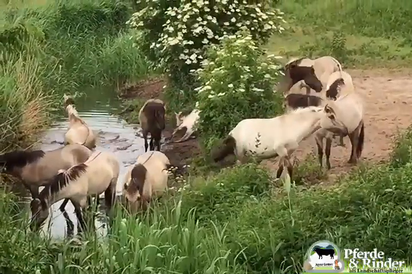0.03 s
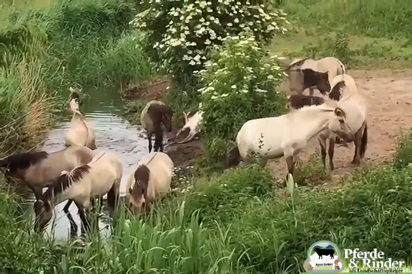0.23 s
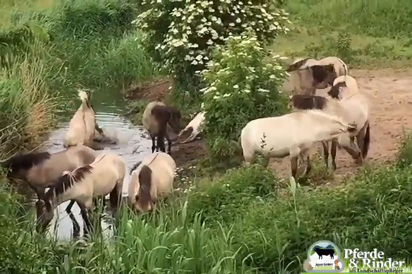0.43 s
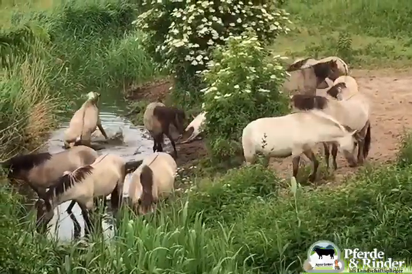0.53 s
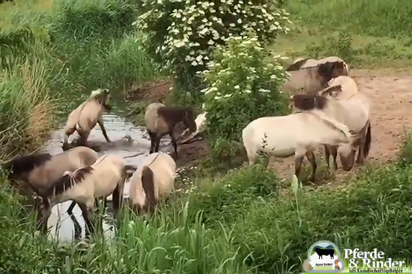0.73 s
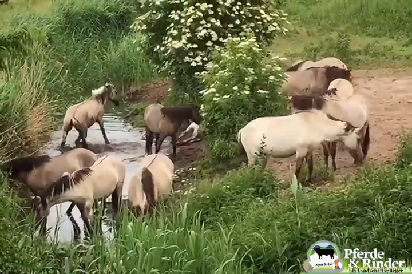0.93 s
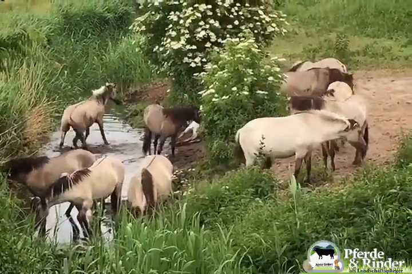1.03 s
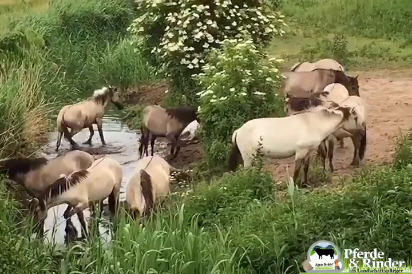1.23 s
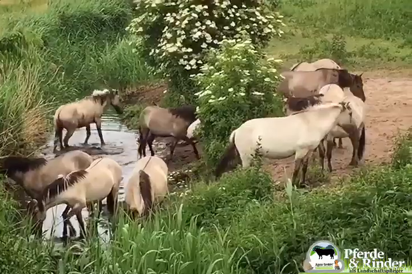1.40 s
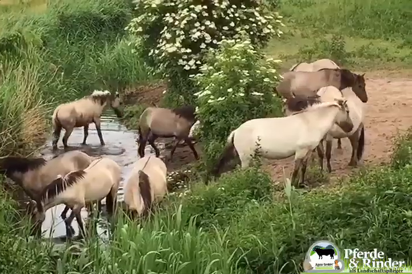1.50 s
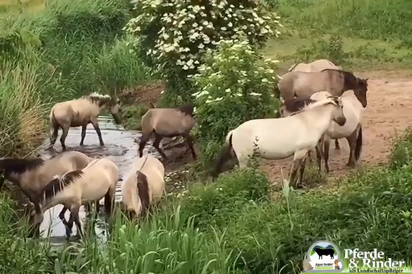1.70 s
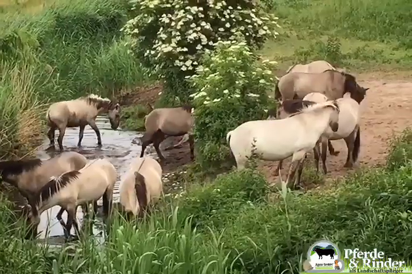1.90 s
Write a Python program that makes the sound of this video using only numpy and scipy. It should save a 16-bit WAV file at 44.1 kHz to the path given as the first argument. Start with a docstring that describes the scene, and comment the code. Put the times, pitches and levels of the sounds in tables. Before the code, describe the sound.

A horse splashes through shallow water while a small bird chirps and wind rumbles.

```python
"""A shallow pond, where a horse heaves itself up and wades on, some way off.
Each leg throws up spray and a cloud of ringing bubbles. Water slaps down on water, and
pockets of air plop as it closes again. A small bird chirps. Gusts of wind rumble on the
microphone, over the steady hiss of reeds and leaves."""
import sys
import numpy as np
from scipy import signal
from scipy.fft import rfft, irfft
from scipy.io import wavfile
from scipy.ndimage import uniform_filter1d

SR = 44100
rng = np.random.default_rng(int(sys.argv[2]) if len(sys.argv) > 2 else 0)


def put_to_file(sound):
    """Save the sound as 16-bit audio at rate SR, in the file named by the first command-line argument."""
    columns = np.atleast_2d(sound).T  # one column per channel
    safe = np.clip(columns, -1, 1)
    whole_steps = np.round(safe * 32767)
    wavfile.write(sys.argv[1], SR, whole_steps.astype(np.int16))


N = 85995

# A "colour" says how strong the low and high parts of a sound are, compared with each other.
# hiss of reeds and leaves (frequency [Hz], level [dB])
LEAF_COLOUR = [(88, -27), (150, -43), (175, 2.5), (490, -2.5), (561, -1.5), (766, -2), (894, -1.5),
               (1150, -0.5), (1400, -2), (4060, -6.5), (4650, -10), (5130, -9), (15500, -21)]
# deep rumble of the wind (frequency [Hz], level [dB])
RUMBLE_COLOUR = [(25, -22), (40, 0.5), (55, -2), (76, 1), (92, -4), (120, -23), (160, -36.5)]
# how the rumble comes and goes (time [s], level [dB])
RUMBLE_GUSTS = [(0.0, -73), (0.033, -63.5), (0.065, -89), (0.093, -48), (.125, -59), (0.175, -58),
                (0.2, -46.5), (0.227, -41), (0.266, -56), (.282, -49), (0.307, -41.5), (0.336, -51.5),
                (0.386, -43), (0.404, -33.5), (0.429, -32), (0.446, -47), (0.495, -50), (0.516, -41),
                (0.551, -46.5), (.57, -60), (0.589, -43), (0.64, -59), (0.668, -37.5), (0.69, -50),
                (0.709, -33.5), (0.738, -68), (0.782, -43), (0.802, -64), (0.828, -44), (0.874, -60),
                (0.898, -56), (0.94, -35.5), (0.982, -54), (1.004, -43.5), (1.062, -40.5), (1.086, -50),
                (1.136, -43.5), (1.182, -60), (1.231, -40.5), (1.26, -49), (1.337, -50), (1.362, -42),
                (1.377, -40.5), (1.401, -56), (1.473, -43.5), (1.51, -57.5), (1.574, -46.5), (1.62, -65),
                (1.655, -54), (1.69, -60), (1.735, -59), (1.777, -50.5), (1.9, -73), (1.95, -57)]
# flutter of the wind, a little higher than the rumble (frequency [Hz], level [dB])
FLUTTER_COLOUR = [(115, 5), (140, -0.5), (195, -6.5), (250, -20), (320, -22.5)]
# how the flutter comes and goes (time [s], level [dB])
FLUTTER_GUSTS = [(0.0, -77), (.18, -71), (.235, -56.5), (.285, -68), (0.334, -48.5), (.36, -63),
                 (.395, -50), (.435, -70), (.49, -59.5), (0.55, -44), (.582, -64), (.612, -51), (.645, -60),
                 (0.681, -57), (0.696, -47), (.722, -66), (.77, -56), (.87, -71), (0.929, -47), (.975, -62),
                 (1.06, -61.5), (1.33, -70.5), (1.95, -74.5)]
# bird notes (start [s], length [s], first pitch [Hz], middle pitch [Hz], last pitch [Hz],
# level of the tone an octave up [dB], level of the base tone [dB])
CHIRPS = [(0.052, 0.05, 2213, 2385, 2230, -59.5, -67), (0.098, .012, 2190, 2160, 2120, -65, -78),
          (0.222, 0.018, 2300, 2336, 2290, -57, -56.5), (0.242, 0.023, 2085, 2017, 2030, -58, -85),
          (0.372, 0.018, 2270, 2180, 2220, -57, -66), (0.389, 0.02, 1975, 1934, 1990, -55, -72),
          (0.514, 0.01, 2170, 2180, 2194, -54.5, -76), (0.524, 0.022, 2260, 2310, 2300, -59, -61),
          (0.549, 0.016, 2000, 1990, 1990, -57.5, -82), (0.679, 0.042, 2245, 2330, 2345, -56, -56.5),
          (0.769, 0.012, 2170, 2190, 2200, -57.5, -77), (0.819, 0.037, 2270, 2288, 2254, -56, -55.5),
          (1.144, 0.0425, 2247, 2255, 2350, -62, -58.5), (1.31, 0.047, 1946, 1930, 2030, -67, -83)]
# patter of the spray (frequency [Hz], level [dB])
SPRAY_COLOUR = [(500, 2.5), (1500, -22), (3000, 2), (4500, -8), (6200, -3), (7500, -9), (9500, -10.5),
                (10600, -16.5), (12500, -11.5), (15500, -26)]
# thin jets of water (peak time [s], rise [s], fall [s], level [dB], centre frequency [Hz])
JETS = [(1.196, 0.01, 0.012, -66, 10900), (1.567, 0.02, .016, -66.5, 9300),
        (1.676, 0.0069, 0.0097, -61, 6200)]
# water landing flat on water (time [s], peak level [dB], centre frequency [Hz])
SLAPS = [(0.8425, -49, 1500), (0.8621, -42, 3060), (0.9986, -42, 2350), (1.521, -47, 1820)]
# crack of one slap (frequency [times the centre frequency], level [dB])
SLAP_COLOUR = [(.5, -12), (1, 18), (1.5, 5.5), (2.2, -5), (3.3, -9), (5.2, -12)]
# big air pockets (time [s], pitch [Hz], peak level [dB], fade time [s], rise [times the fade time])
AIR_POCKETS = [(.504, 645, -50.5, 0.0068, .8), (.7842, 816, -41.5, 0.0014, 1.2),
               (.8535, 920, -36.5, 0.0017, 0.83), (.852, 602, -41.5, 0.0033, 0.89),
               (.876, 1140, -46, 0.0031, 0.94), (.909, 1190, -40.5, 0.0029, .7),
               (.921, 595, -44, 0.0042, 0.77), (0.926, 340, -55, .004, 0.88), (.964, 1056, -45, 0.004, .7),
               (0.973, 1720, -53, 0.0033, 0.58), (0.9998, 1160, -32, 0.00076, .7),
               (1.1045, 583, -43, 0.0049, 1.25), (1.4405, 732, -40.5, 0.0035, 1.1),
               (1.4565, 692, -42.5, 0.0043, 0.65), (1.531, 927, -46.5, 0.0031, .6),
               (1.637, 600, -52, 0.0067, 1.7), (1.659, 629, -42, 0.007, 0.77),
               (1.661, 910, -43, .0035, 0.52), (1.692, 1580, -48, 0.0033, 0.44),
               (1.700, 905, -46, .006, 0.27), (1.716, 1795, -54.5, 0.0063, 0.65)]
# falling drops (time [s], pitch [Hz], peak level [dB], fade time [s])
DROPS = [(1.151, 3460, -55.5, 0.0034), (1.153, 2320, -50.5, 0.0023), (1.243, 1880, -56, .004),
         (1.277, 1670, -50.5, .008), (1.304, 1550, -52.5, 0.0059), (1.320, 1530, -55.5, 0.004),
         (1.732, 2750, -47.5, 0.0018)]
# surges of water pushed by the legs (peak time [s], rise [s], fall [s], bubble level before
# colouring [dB], middle bubble pitch [Hz], spread of pitches [octaves], spray level [dB])
SURGES = [(.512, .009, 0.011, -59, 675, 0.303, -80), (.548, 0.024, 0.042, -58, 1289, 0.72, -70),
          (.65, 0.043, 0.1, -60, 1271, 0.76, -62), (.721, 0.028, 0.16, -78, 2640, 0.64, -66),
          (.797, 0.017, 0.033, -53.5, 910, 0.61, -61), (.843, .012, 0.046, -49.5, 1007, 0.58, -55),
          (.918, 0.031, .069, -49.5, 850, 0.72, -58.5), (.975, 0.013, 0.027, -47.5, 1297, 0.42, -60.5),
          (1.02, .026, 0.058, -49.5, 1422, 0.78, -59), (1.115, 0.017, 0.034, -53.5, 1046, 0.31, -64.5),
          (1.16, .025, 0.13, -57.5, 1700, 0.82, -64), (1.285, 0.042, 0.23, -61, 1462, 0.75, -68),
          (1.411, .008, 0.05, -57, 929, 0.358, -65.5), (1.525, .022, 0.035, -54.5, 1432, 0.78, -62),
          (1.573, .018, 0.023, -54.5, 1405, 0.73, -60.5), (1.653, 0.021, 0.017, -54, 621, .17, -67),
          (1.705, .016, 0.021, -52.5, 1051, 0.459, -61.5), (1.84, 0.021, 0.022, -64, 1190, 0.66, -87)]
# tone of the bubble clouds (frequency [Hz], boost or cut [dB])
CLOUD_COLOUR = [(200, -26), (350, 2.5), (460, -3.5), (590, 6), (760, -4), (1000, 3.5), (1200, -4),
                (1400, -3.5), (1650, 1), (2000, -3), (2800, 3), (4000, -4), (9000, 1.5)]


def gain(db):
    """Turn decibels into a number to multiply a sound by."""
    return 10 ** (np.asarray(db) / 20)


def unit(x):
    """Scale a signal so that its average strength (rms) is 1."""
    return x / np.sqrt(np.mean(x ** 2) + 1e-20)


def colour(x, points):
    """Shape the lows and highs by (Hz, dB) points, dropping 23.5 dB an octave past both ends."""
    hz, db = np.array(points, float).T
    octave = np.log2(np.maximum(np.arange(N + 1) * SR / (2 * N), 1))
    outside = np.maximum(np.log2(hz[0]) - octave, 0) + np.maximum(octave - np.log2(hz[-1]), 0)
    curve_db = np.interp(octave, np.log2(hz), db) - 23.5 * outside
    return irfft(rfft(x, 2 * N) * gain(curve_db))[:N]


def drift(turns_per_s):
    """A smooth random wander, about 1 in size."""
    step = max(int(SR / turns_per_s), 1)
    stairs = np.repeat(rng.standard_normal(N // step + 1), step)
    return unit(uniform_filter1d(stairs, step)[:N])


def add(out, start, sound):
    """Mix a sound in at a start time in seconds."""
    i = int(start * SR)
    if 0 <= i < N:
        out[i:i + len(sound)] += sound[:N - i]


def swell(peak, rise, fall):
    """A loudness curve that rises smoothly to its peak, then dies away."""
    t = np.arange(N) / SR - peak
    return np.exp(-.5 * (np.minimum(t, 0) / rise) ** 2 - np.maximum(t, 0) / fall)


def echo(x, level_db, tail_s):
    """Banks and bushes scatter sound back as a soft tail that fades by 60 dB in tail_s."""
    t = np.arange(SR // 2) / SR
    tail = rng.standard_normal(len(t)) * np.exp(-np.log(1000) * t / tail_s) * (t > .006)
    return x + gain(level_db) * signal.fftconvolve(x, tail / np.linalg.norm(tail))[:N]


def leaves(level_db=-62.5):
    """Far reeds and bushes hiss at a nearly steady level."""
    hiss = unit(colour(rng.standard_normal(N), LEAF_COLOUR))
    return hiss * gain(level_db + .5 * drift(6.35))


def swirls(tone, gusts, smooth_s=0.036):
    """Swirls of air hit the microphone: low noise, evened out so that the gusts set its loudness."""
    noise = colour(rng.standard_normal(N), tone)
    power = np.abs(signal.hilbert(noise)) ** 2 / 2
    strength = np.sqrt(uniform_filter1d(power, int(smooth_s * SR)))
    times, db = np.array(gusts).T
    return noise / strength * gain(np.interp(np.arange(N) / SR, times, db))


def wind(boost_db=1):
    """Big swirls of air rumble, and smaller ones flutter in the early gusts."""
    rumble = swirls(RUMBLE_COLOUR, RUMBLE_GUSTS)
    flutter = swirls(FLUTTER_COLOUR, FLUTTER_GUSTS)
    return gain(boost_db) * (rumble + flutter)


def bird(tremble_db=0.9):
    """A small bird sings short bending notes: a base tone plus a mostly louder one an octave up."""
    out = np.zeros(N)
    wobble = 1 + 0.0068 * drift(300)
    for start, length, first_hz, middle_hz, last_hz, octave_db, base_db in CHIRPS:
        progress = np.linspace(0, 1, int(length * SR))
        bend = np.polyfit([0, .5, 1], [first_hz, middle_hz, last_hz], 2)
        hz = np.polyval(bend, progress) * wobble[int(start * SR):][:len(progress)]
        phase = 2 * np.pi * np.cumsum(hz) / SR
        note = gain(base_db) * np.sin(phase) + gain(octave_db) * np.sin(2 * phase)
        loudness = np.sqrt(np.abs(np.sin(np.pi * progress)))
        add(out, start, loudness * note)
    return out * gain(tremble_db * drift(160))


def spray(droplets_per_s=6200, scatter_db=0.5):
    """Fine droplets patter back down with each surge, each one a tiny tick."""
    lands = rng.random(N) < droplets_per_s / SR
    ticks = lands * rng.standard_normal(N) * gain(scatter_db * rng.standard_normal(N))
    power = sum((gain(db) * swell(peak, rise, fall)) ** 2 for peak, rise, fall, *_, db in SURGES)
    return unit(colour(ticks, SPRAY_COLOUR)) * np.sqrt(power)


def jets(half_width_octaves=0.33):
    """Thin jets squirt up beside a hoof, each with a brief high hiss."""
    out = np.zeros(N)
    edge = 2 ** half_width_octaves
    for peak, rise, fall, db, hz in JETS:
        band = [(hz / edge, -12), (hz, 0), (hz * edge, -12)]
        hiss = unit(colour(rng.standard_normal(N), band))
        out += hiss * gain(db) * swell(peak, rise, fall)
    return out


def slaps(fade_s=0.0028):
    """A sheet of water lands flat with a short crack; the smaller the sheet, the higher it sounds."""
    out = np.zeros(N)
    t = np.arange(N) / SR
    for start, db, hz in SLAPS:
        burst = rng.standard_normal(N) * (t >= start) * np.exp(-np.abs(t - start) / fade_s)
        crack = colour(burst, [(hz * multiple, level) for multiple, level in SLAP_COLOUR])
        out += gain(db) * crack / np.abs(crack).max()
    return out


def bubble(hz, fade_s, rise, climb=0.019):
    """A pocket of air rings, and its pitch climbs as it nears the surface."""
    age = np.arange(int(6 * fade_s * SR) + 2) / (SR * fade_s)  # counted in fade times, like rise
    loudness = (1 - np.exp(-(age / rise) ** 2)) * np.exp(-age)
    phase = 2 * np.pi * hz * fade_s * (age + climb * age ** 2 / 2)
    return loudness / loudness.max() * np.sin(phase)


def plops():
    """Big air pockets and falling drops each ring out as one clear bubble."""
    out = np.zeros(N)
    for start, hz, db, fade_s, rise in AIR_POCKETS:
        add(out, start, gain(db) * bubble(hz, fade_s, rise))
    for start, hz, db, fade_s in DROPS:
        add(out, start, gain(db) * bubble(hz, fade_s, rise=0.32))
    return out


def bubble_clouds(bubbles_per_s=2100, fade_cycles=3.7, scatter_db=1.7):
    """Each surge from a leg traps a thick cloud of small bubbles, pitched around its own middle note."""
    out = np.zeros(N)
    for peak, rise, fall, db, middle_hz, spread, _ in SURGES:
        cloud = np.zeros(N)
        start, length = peak - 3 * rise, 3 * rise + 4 * fall
        count = int(bubbles_per_s * length)
        chances = rng.standard_normal((2500, 4))[:count]  # four random numbers for each bubble
        for k, (late, pitch, loud, ring) in enumerate(chances):
            hz = np.clip(middle_hz * 2 ** (spread * pitch), 250, 10000)
            fade_s = fade_cycles * np.exp(0.36 * ring) / hz
            strength = gain(scatter_db * loud) * np.sqrt(hz / middle_hz)
            add(cloud, start + (k + late) / bubbles_per_s, strength * bubble(hz, fade_s, rise=0.42))
        cloud = unit(cloud) * np.sqrt(length * SR / N)  # strength near 1 while the cloud lasts
        out += cloud * gain(db) * swell(peak, rise, fall)
    return colour(out, CLOUD_COLOUR)


def scene():
    """Mix leaves, wind, bird and the wading horse into one channel."""
    wash = echo(bubble_clouds() + spray() + jets(), level_db=-7.5, tail_s=0.36)
    hits = echo(plops() + slaps(), level_db=-9.5, tail_s=0.36)
    song = echo(bird(), level_db=-8.5, tail_s=0.17)
    background = wind() + leaves()
    return (background + song + wash + hits)[None]


def record(dry, low_hz=33, top_hz=15700):
    """The recorder cuts away the deepest bass and the highest treble."""
    bass_cut = signal.butter(3, low_hz, "high", fs=SR, output="sos")
    treble_cut = signal.ellip(10, .2, 80, top_hz, fs=SR, output="sos")
    thinned = signal.sosfiltfilt(bass_cut, dry, padtype="even")
    return signal.sosfilt(treble_cut, thinned)


dry = scene()
out = record(dry)
put_to_file(out)
```